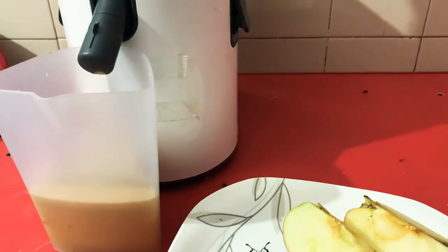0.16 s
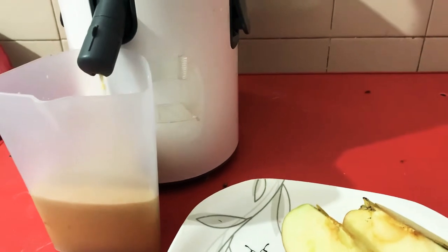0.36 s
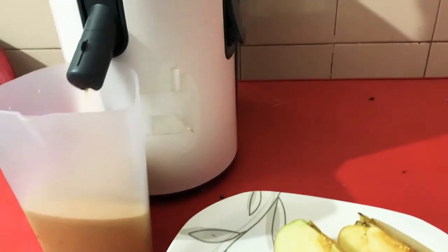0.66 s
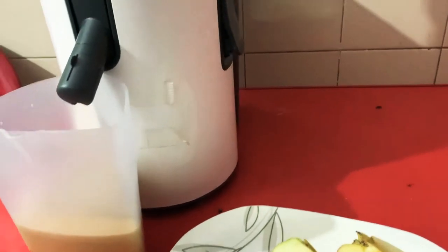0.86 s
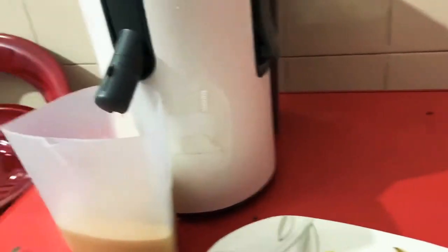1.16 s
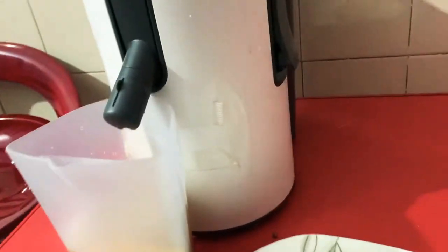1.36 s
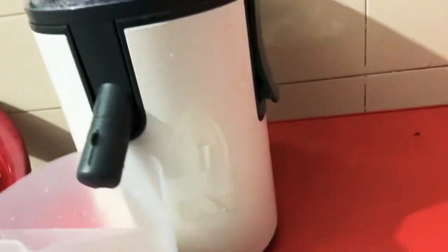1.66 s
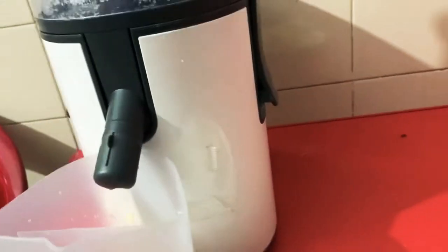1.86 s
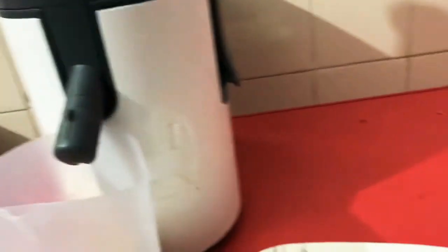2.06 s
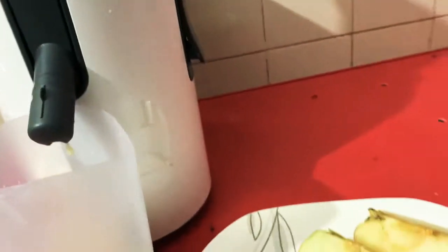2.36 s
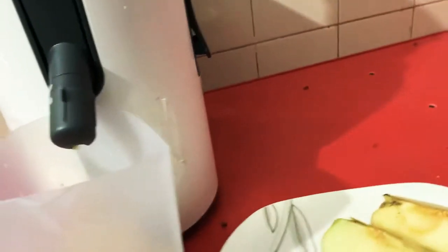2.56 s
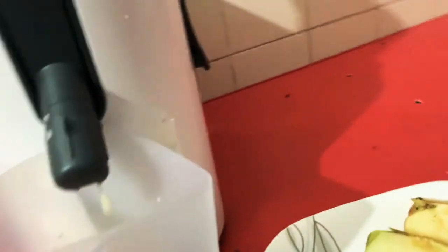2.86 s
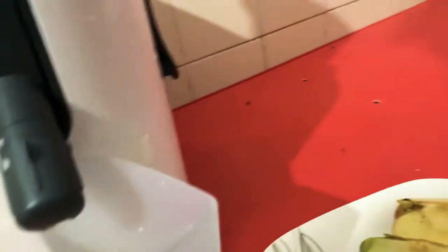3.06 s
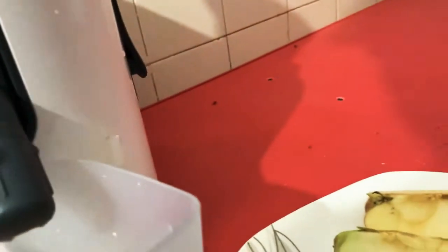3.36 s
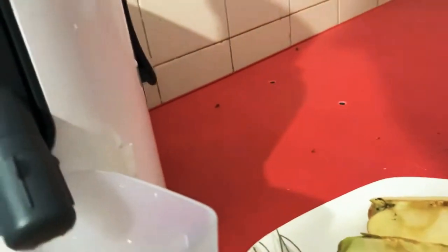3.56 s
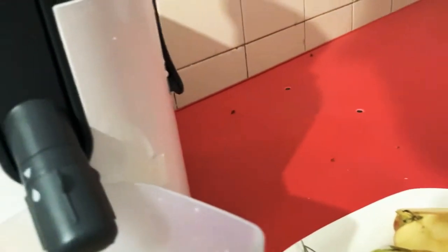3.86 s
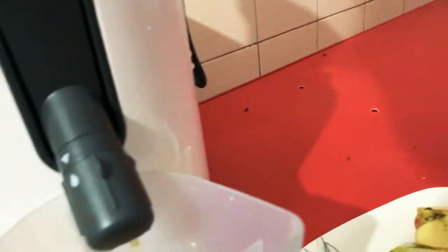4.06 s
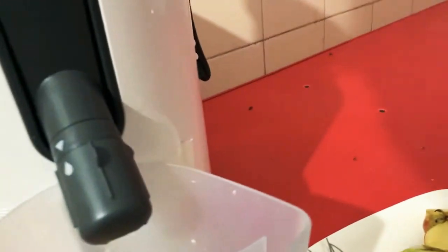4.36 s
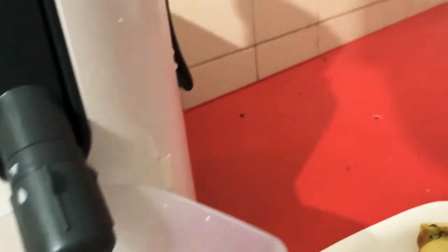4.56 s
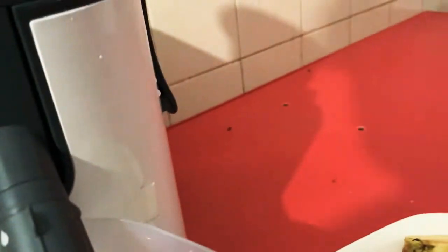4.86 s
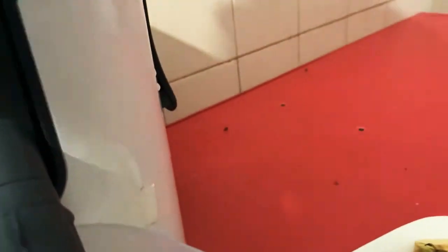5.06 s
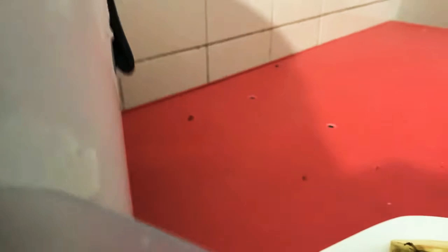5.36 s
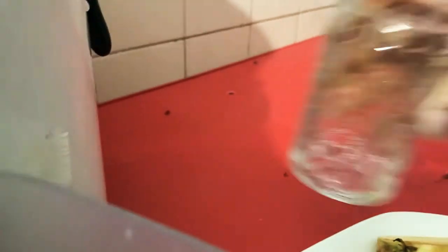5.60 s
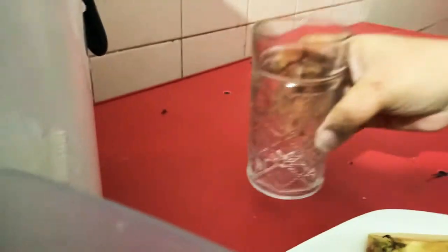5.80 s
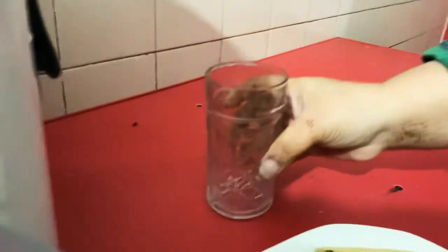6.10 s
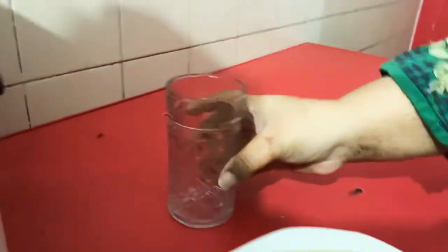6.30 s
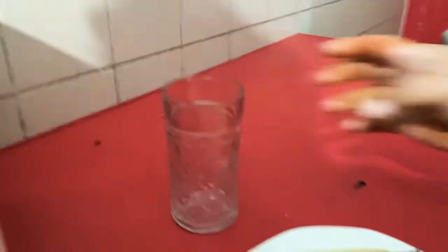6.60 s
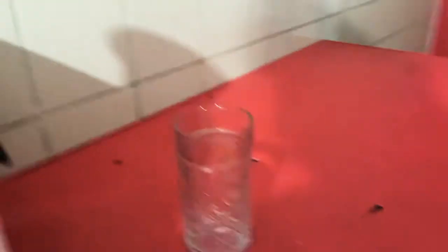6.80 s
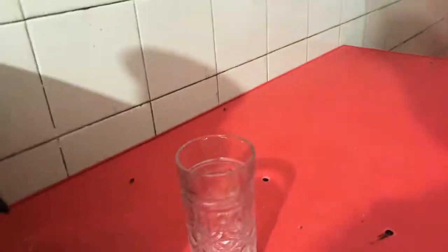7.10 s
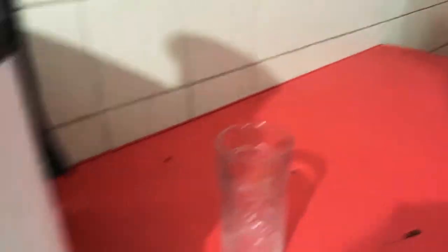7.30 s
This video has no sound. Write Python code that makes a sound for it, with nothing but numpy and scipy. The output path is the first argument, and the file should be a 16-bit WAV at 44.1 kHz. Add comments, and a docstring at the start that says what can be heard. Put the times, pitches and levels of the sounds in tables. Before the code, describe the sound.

Continuous motor drone from a kitchen juicer, rising very slightly in pitch at first, then steady, with brush hiss and rattly squeal. One dry tick comes midway. The handheld stereo microphone drifts from spout to housing, making the sound more nasal, whiny and bright. A glass thuds onto the counter, the power switch snaps brightly off the tiles, the buzz vanishes and the hum slides smoothly downward.

```python
"""Juicer switched off in a tiled kitchen

A centrifugal juicer on a counter: sines at rotor multiples hum and whine, current pulses buzz, shaped noise
makes air and brushes hiss, a wandering sine is pulp on the sieve. Decaying sines set down a glass, noise
bursts snap the switch, the rotor coasts down. A hand-held microphone pair moves around the machine, through
the standing waves of the corner."""
import sys
import numpy as np
from scipy import signal
from scipy.fft import rfft, irfft, next_fast_len
from scipy.io import wavfile
from scipy.ndimage import map_coordinates

SR = 44100
rng = np.random.default_rng(int(sys.argv[2]) if len(sys.argv) > 2 else 0)


def generate_wav(signal):
    """Clip the signal to [-1, 1] and save it as 16-bit WAV at the path in sys.argv[1]."""
    frames = np.transpose(np.atleast_2d(signal))
    scaled = np.clip(frames, -1, 1) * 32767
    pcm = np.round(scaled).astype(np.int16)
    wavfile.write(sys.argv[1], SR, pcm)


N = 328104
T = np.arange(N) / SR
OFF_S, MAINS_HZ = 6.138, 50
WHINE_ORDER, FAN_ORDER = 12, 15  # multiples of the rotor speed

# Recovery from the load of the last fruit; air drag halves the speed in COAST_S.
RUN_HZ, SAG_HZ, RECOVER_S, COAST_S = 176.15, 1.6, 0.95, 5.107


def rotor_speed():
    """Turns a second: sagging under load at first, steady, then coasting against air drag."""
    loaded_hz = RUN_HZ - SAG_HZ * np.exp(-T / RECOVER_S)
    return loaded_hz / (1 + np.maximum(T - OFF_S, 0) / COAST_S)


# Phase of the bass between the microphones. Each row: time in seconds, phase in radians.
HUM_SPREAD_RAD = [(0, 0.96), (.5, 1.64), (1.2, 1.77), (3.2, 1.76), (3.78, 0.73), (3.88, 0.16), (6, 0.071),
                  (7.44, 0.077)]
# Higher overtones. Each row: shaft order, level in dB at the spout, level in dB beside the housing,
# before shading and flutter.
OVERTONES_DB = [(6, -50, -41), (7, -39.5, -43), (8, -41, -42), (9, -44.5, -52.5), (10, -65, -50),
                (11, -57, -43), (13, -61, -45.5), (14, -46, -42), (16, -80, -51), (19, -63, -48.5),
                (20, -67, -59), (24, -55, -49.5), (26, -57, -47), (27, -58, -65), (28, -54, -51),
                (36, -60, -51)]
# Low overtones among the standing waves. Each row: time in seconds, level in dB of orders 2, 3, 4 and 5,
# before flutter.
LOW_OVERTONES_DB = [(.2, -49, -38, -56, -46), (.7, -61, -46, -52, -46), (1.35, -43, -33.5, -39, -36.5),
                    (1.9, -34.5, -41, -37, -36), (2.6, -36.5, -50, -34.5, -39), (3.4, -34.5, -43, -32, -40),
                    (3.8, -39, -30, -31, -44), (4.4, -38, -31.5, -31, -38), (5.2, -49, -28, -37.5, -40),
                    (5.9, -31, -27.5, -35, -41), (6.25, -33, -32, -29, -48)]
# Commutator whine. Each row: time in seconds, level in dB before flutter.
WHINE_DB = [(0, -43), (.8, -41), (1.1, -49), (1.5, -38), (2.28, -35), (2.38, -42), (3.2, -38), (3.42, -33),
            (5.3, -35), (5.42, -30), (5.62, -26.5), (5.76, -29.5), (5.86, -38)]
# Cooling fan whine. Each row: time in seconds, level in dB before flutter.
FAN_DB = [(0, -58), (2.7, -54), (3.3, -49), (3.5, -41), (4.2, -36.5), (4.9, -41), (5.15, -48), (5.6, -52)]
# Overtones with the power off. Each row: shaft order, level in dB before the corner's gain and fading.
COASTING_DB = [(2, -25.3), (3, -30.5), (4, -36), (5, -37.5), (6, -39), (7, -42), (10, -41), (11, -48),
               (12, -45.5), (14, -48), (17, -52), (20, -54), (36, -64)]
# Unbalance of the basket: level at the spout, gain beside the housing.
HUM_DB, HUM_NEAR_DB = -18.5, 4
# Microphone positions between which the overtones change balance.
SPOUT_EDGE, HOUSING_EDGE = 0.15, 0.33
# Shade close behind the jug: up to this position, at most this much.
JUG_EDGE, JUG_DB = 0.1, -3
# Flutter among the reflections under power, and roughness towards FADE_HZ (shares 0-1).
SLOW_FLUTTER, FAST_FLUTTER, ROUGHNESS, FADE_HZ = .17, .3, .33, 1050


def overtone_levels(place):
    """Order and running level in dB of each overtone, commutator and fan tone."""
    beside = np.clip((place - SPOUT_EDGE) / (HOUSING_EDGE - SPOUT_EDGE), 0, 1)
    shade_db = JUG_DB * np.clip(1 - place / JUG_EDGE, 0, 1)
    levels = [(round(order), spout_db + (side_db - spout_db) * beside + shade_db)
              for order, spout_db, side_db in OVERTONES_DB]
    levels += list(enumerate(curves(LOW_OVERTONES_DB), 2))
    return levels + [(WHINE_ORDER, curves(WHINE_DB)[0]), (FAN_ORDER, curves(FAN_DB)[0])]


def shaft(angle, speed, power, place):
    """Unbalance, bearings, commutator and fan sound at whole multiples of the rotor speed."""
    hum_db = HUM_DB + HUM_NEAR_DB * place + (1 - power) * corner_db(speed)
    out = amp(hum_db + 0.52 * wobble(14)) * tone(angle, curves(HUM_SPREAD_RAD)[0])
    grid_hz = np.geomspace(100, 12000, 4000)
    standing_db = corner_db(grid_hz)
    for order, db in overtone_levels(place):
        hz = order * speed
        height = np.minimum(order * RUN_HZ / FADE_HZ, 1) ** 4
        rough = ROUGHNESS * height * fading(130)
        flutter = 1.045 + SLOW_FLUTTER * fading(2.34) + FAST_FLUTTER * fading(22) + rough
        running = amp(db) * flutter
        # a high falling tone fades right out and in again
        coast_db = np.interp(order, *np.transpose(COASTING_DB)) + np.interp(hz, grid_hz, standing_db)
        fade = np.sqrt(1 - height ** 2) + height * fading(14)
        coasting = amp(coast_db) * fade * (1 + rough)
        gain = power * running + (1 - power) * coasting
        out += np.abs(gain) * tone(order * angle + np.angle(gain), apart(hz, place))
    return out


# Standing waves of the corner that tones sweep through. Each row: centre in Hz, half width (1/e) in Hz,
# gain in dB.
CORNER = [(147.4, 13, -5.5), (161.5, 1.1, -7), (295, 22, 5.5), (325.4, 2.6, -15), (341, 4, 6), (423, 6, 5),
          (445.6, 3.5, -13), (460, 5, 5.5), (477, 7, -10), (493, 6, 6), (508, 6, -3), (563, 6, 5),
          (621, 5, -12), (636, 6, 6), (692, 47, 11), (800, 45, -14), (2040, 60, 4)]


def corner_db(hz):
    """Gain of a tone as its pitch passes the peaks and nodes of the corner."""
    return sum(db * np.exp(-((hz - centre) / half) ** 2) for centre, half, db in CORNER)


# Motor tones that stand out. Each row: shaft order, mains multiple, level in dB at the spout,
# level in dB beside the housing, before wobble.
MAGNETIC = [(0, 1, -52, -45), (0, 2, -31, -27.5), (1, -1, -37.5, -29.5), (1, 2, -28, -32),
            (2, 1, -35.5, -24.5), (2, 3, -36.5, -37.5), (4, -2, -36, -68), (12, -2, -48, -43),
            (12, -1, -45, -56)]
# Weak sidebands: level at the spout, change beside the housing.
SIDEBAND_DB, SIDEBAND_NEAR_DB = -46, 8


def sidebands():
    """The motor tones that stand out, and an even bed of weak ones in between."""
    strong = {(round(order), round(multiple)): levels for order, multiple, *levels in MAGNETIC}
    weak = {(order, multiple): (SIDEBAND_DB, SIDEBAND_DB + SIDEBAND_NEAR_DB)
            for order in (0, 1, 2, 3) for multiple in (-2, -1, 1, 2, 3) if order or multiple > 1}
    return {**weak, **strong}.items()


# Buzz spectrum. Each row: frequency in Hz, relative gain in dB.
BUZZ = [(60, -22), (200, -6), (330, -1), (480, -2.5), (660, -1.5), (850, -4.5), (1150, -6), (1400, -8.5),
        (1900, -11), (2600, -17), (4500, -21), (9000, -32)]


def motor(angle, current, power, place):
    """Current pulses pull on the turning rotor: mains sidebands stand around the shaft orders."""
    mains = 2 * np.pi * MAINS_HZ * T
    tones = np.zeros((2, N))
    for (order, multiple), (spout_db, side_db) in sidebands():
        phase = order * angle + multiple * mains
        db = spout_db + (side_db - spout_db) * place + (1.2 + .5 * order) * wobble(5)
        hz = np.gradient(phase) * SR / (2 * np.pi)
        tones += amp(db) * tone(phase, apart(hz, place))
    # the pull peaks once a turn; it meets every other current pulse, so the buzz throbs
    turn = np.linspace(0, 2 * np.pi, 1024)
    orders = np.arange(1, 40)[:, None]
    profile = np.sin(orders * turn + rng.normal(0, .45, orders.shape)).sum(0)
    # the steady part of the pull belongs to the plain shaft orders
    pulses = current - current.mean()
    pull = coloured(pulses * np.interp(angle % (2 * np.pi), turn, profile), BUZZ)
    # beside the housing the buzz is more nasal
    nasal = filtered(pull, lambda hz: resonance(hz, centre_hz=950, width_hz=500))
    pull = pull + .9 * place * nasal
    # as the microphones drift, one set of reflections gives way to another
    drift = 1.27 * T + 0.83 * wobble(2.02)
    reflections = np.cos(drift) * kitchen(pull) + np.sin(drift) * kitchen(pull)
    buzz = unit(heard(pull, place, room_db=-12) + amp(-5) * unit(reflections))
    return power * (tones + amp(-30.3 + 3.2 * place) * buzz)


# Motor housing ringing near the commutator pitch. Each row: time in seconds, level in dB before wobble.
HOUSING_DB = [(0, -61), (2.6, -42), (3.4, -46), (5.22, -41), (5.4, -29.5), (5.7, -31.5), (5.85, -37),
              (6.1, -35.5), (6.4, -48), (7.44, -61)]


def housing(angle, current, power, place):
    """The motor housing rings near the commutator pitch; each current pulse makes the whine rasp in it."""
    ring = unit(ringing(centre_hz=2110, width_hz=400))
    rasp = unit((current - current.mean()) * np.sin(WHINE_ORDER * angle))
    sound = heard(ring + amp(-7) * power * rasp, place, room_db=-4.5)
    return amp(curves(HOUSING_DB)[0] + 1.2 * wobble(23)) * sound


# Fan air spectrum. Each row: frequency in Hz, relative level in dB per Hz.
AIR = [(25, -20), (60, 1.5), (130, 7), (300, 2.5), (700, -3.5), (1300, -3.5), (2100, -8.5), (3000, -8.5),
       (5000, -9), (8000, -20), (15000, -29)]


def air(power, place):
    """Fan air: broad noise, a little weaker with the power off."""
    db = -31.6 + 2.4 * power + 1.6 * wobble(6)
    return amp(db) * heard(coloured(rng.standard_normal(N), AIR), place, room_db=7.5)


# Body rumble spectrum. Each row: frequency in Hz, relative level in dB per Hz.
RUMBLE = [(25, -35), (50, -12), (85, -3), (115, 12), (170, -33), (230, 0), (320, -2), (480, -4.5), (800, 1),
          (1600, -28)]


def rumble(power, place):
    """The shaking body: low noise, stronger beside the housing."""
    db = -33 + 6 * place - 11 * (1 - power) + 0.81 * wobble(6.2)
    return amp(db) * heard(coloured(rng.standard_normal(N), RUMBLE), place, room_db=7.0)


# Noise ringing in the sieve basket. Each row: time in seconds, level in dB before wobble,
# side gain over mid in dB.
BASKET = [(0, -30, 1), (.3, -30.5, -11), (1.4, -32, -12.5), (2.4, -29, 2.5), (3.2, -27.5, 3.5),
          (5, -29, 8.5), (5.5, -26.5, 12), (6.2, -26, 10), (7.44, -33.5, 17)]


def sieve(angle, current, power, place):
    """The sieve basket rings as a noise resonance, pumped by the current pulses and the turn."""
    basket_db, width_db = curves(BASKET)
    pumping = 1 + .6 * power * current * (1 + np.sin(angle))
    ring = heard(ringing(centre_hz=1530, width_hz=450) * pumping, place, room_db=7)
    return widened(amp(basket_db + .6 * wobble(14) + 1.8 * wobble(55)) * ring, width_db)


# Brush hiss. Each row: time in seconds, level in dB before wobble.
BRUSHES_DB = [(0, -47), (1.2, -36.5), (2.6, -35.5), (3.4, -32.5), (4.6, -33), (5.5, -30), (6.1, -36),
              (6.5, -34), (7.44, -40.5)]
# Brush hiss spectrum. Each row: frequency in Hz, relative level in dB per Hz.
HISS = [(900, 1), (2200, 0), (2700, -3), (3300, -3), (4600, 2), (5600, -3), (6400, -3.5), (8200, -9),
        (10500, -7), (14000, -36)]


def brushes(angle, current, power, place):
    """The brushes scrape harder once a turn and spark with each current pulse."""
    strength = 1 + 0.85 * np.sin(angle) + 0.43 * power * current * (1 + np.sin(angle))
    scrape = rng.standard_normal(N) * strength * amp(1.7 * wobble(150))
    db = curves(BRUSHES_DB)[0] + 0.41 * wobble(13.0) + 1.0 * wobble(40)
    return amp(db) * heard(coloured(scrape, HISS), place, room_db=13.0)


# Pulp chatter. Each row: time in seconds, level in dB.
CHATTER_DB = [(0, -35), (.15, -28), (.35, -31), (1.1, -30.5), (2.3, -32.5), (2.5, -29.5), (2.65, -34),
              (3.3, -34), (4.1, -30.5), (4.85, -34), (5.02, -28.5), (5.2, -42), (6.5, -52)]
CHATTER_HZ, CHATTER_WANDER_HZ = 1540, 70


def chatter(place):
    """Pulp chatters on the sieve: a rattly squeal of restless pitch that comes in quick spurts."""
    hz = CHATTER_HZ + CHATTER_WANDER_HZ * wobble(85)
    spurts = amp(2 * wobble(18) + 3 * wobble(110))
    squeal = unit(spurts * np.sin(2 * np.pi * np.cumsum(hz) / SR))
    return amp(curves(CHATTER_DB)[0]) * widened(heard(squeal, place, room_db=-1), width_db=-4)


# Noise bands, narrow and wide: middle tones, a low bump, airy treble. Each row: peak time in seconds,
# half length (1/e) in seconds, centre in Hz, resonance width in Hz, peak level in dB.
SWELLS = [(.45, 0.21, 277, 51, -43), (0.703, 0.21, 708, 80, -34), (1.5, 2.6, 12500, 4500, -52),
          (4.1, 0.52, 2870, 500, -41), (4.222, 0.19, 95, 60, -24), (4.398, 2.9, 1068, 270, -40.5),
          (5.552, 0.78, 5150, 400, -39.5), (6.43, 0.17, 13600, 450, -45), (7.102, 0.56, 2860, 603, -40),
          (1.375, 0.072, 1910, 50, -30), (2, 4.4, 10500, 350, -48), (6.657, .05, 1590, 90, -34),
          (7.355, .06, 1440, 70, -32)]


def swells(place):
    """Bands of noise, narrow and wide, that rise and fall once."""
    bands = sum(amp(db) * np.exp(-((T - s) / half_s) ** 2) * unit(ringing(hz, width_hz))
                for s, half_s, hz, width_hz, db in SWELLS)
    return bands.std() * heard(bands, place, room_db=7)


# Glass meets counter. Each row: time in seconds, relative level in dB.
KNOCKS = [(6.0552, -11.5), (6.0608, -4.5), (6.084, -13.5), (6.094, -21)]
# Modes of glass on counter top. Each row: frequency in Hz, relative level in dB, t60 in seconds.
COUNTER = [(112, -29, 0.15), (261, -3, 0.14), (314, -1, 0.06), (490, 4.5, 0.029), (620, 5.5, 0.026),
           (784, 1.5, 0.028), (900, -12, .04)]


def glass():
    """The hand-damped glass lands on its rim, then flat, and thumps the counter."""
    out = np.zeros(N)
    for s, db in KNOCKS:
        start = round(s * SR)
        t = np.maximum(T - s, 0)[start:][:SR // 3]
        ring = sum(amp(level_db + rng.normal(0, 1) - 60 * t / t60) * np.sin(2 * np.pi * hz * t)
                   for hz, level_db, t60 in COUNTER)
        attack = 1 - np.exp(-t / .0009)
        out[start:][:len(t)] += amp(db - 4) * ring * attack
    return amp(1) * out + amp(-10) * kitchen(out)


# Switch rocks over, lands and rattles. Each row: time in seconds, level in dB, t60 in seconds,
# room level in dB relative to direct.
CLICKS = [(6.1297, -16, .026, 2), (6.1358, -22, .03, 5), (6.1405, -22.5, .04, 8), (6.1505, -24, .05, 8)]
# Click spectrum. Each row: frequency in Hz, relative level in dB per Hz.
SNAP = [(150, 19), (600, 11), (2000, -10), (3500, 7.5), (5000, 2), (7000, 6), (10000, -2.5), (15000, -10)]


def clicks():
    """Hard plastic snaps: short bright bursts that the tiles throw back."""
    noise = coloured(rng.standard_normal(N), SNAP)
    direct, thrown = np.zeros(N), np.zeros(N)
    for s, db, t60, room_db in CLICKS:
        burst = noise * (T >= s) * amp(db - 60 * np.maximum(T - s, 0) / t60)
        direct += burst
        thrown += amp(room_db) * burst
    return direct + kitchen(thrown)


# Clack spectrum. Each row: frequency in Hz, relative level in dB per Hz.
PIP = [(1200, -18), (2200, 1), (3000, 0), (3900, 0), (4800, -11), (14000, -26)]
PIP_S, PIP_DB = 3.3548, -18.5  # level of the clack at its onset


def pip():
    """One dry tick of a pip flung against the basket: a bright crack and a short plastic clack."""
    t = np.maximum(T - PIP_S, 0)
    clack = coloured(rng.standard_normal(N), PIP) * amp(-60 * t / .045)
    crack = .5 * rng.standard_normal(N) * amp(-60 * t / .007)
    tick = amp(PIP_DB) * (T > PIP_S) * (clack + crack)
    return tick + amp(-7) * kitchen(tick)


# Room decay. Each row: frequency in Hz, t60 in seconds.
KITCHEN_T60_S = [(150, 1), (1500, 0.59), (7000, 0.42), (14000, 0.56)]


def kitchen(x):
    """The tiled room's answer at both microphones; the bass is alike in both."""
    hz, t, z = signal.stft(rng.standard_normal((2, SR // 2)), SR, nperseg=256)
    z = z * amp(-60 * t / along(KITCHEN_T60_S, hz)[:, None])
    z[1] *= (np.hypot(hz, 170) / np.hypot(hz, 700))[:, None]
    mid, side = signal.istft(z, SR, nperseg=256)[1]
    tail = np.array([mid + side, mid - side])
    tail = tail / np.linalg.norm(tail[0])
    # steady sounds have already filled the room at the start
    running = np.pad(x, (SR // 2, 0), 'reflect')
    return signal.fftconvolve(running[None], tail, axes=1)[:, SR // 2:][:, :N]


# Depth of the microphones in a node of a low room mode. Each row: time in seconds, share 0-1.
NODE = [(0, 0), (.6, 0.04), (1.05, 0.85), (2.9, 1), (3.4, 0.1), (7.44, 0)]


def standing_wave(x):
    """Long waves reach both microphones alike, but differ in phase near the spout and astride a node."""
    mid, side = mid_side(x)

    def band(centre_hz, width_hz, turn):
        return filtered(mid, lambda hz: turn * np.abs(resonance(hz, centre_hz, width_hz)) ** 2)

    node, spread = curves(NODE)[0], curves(HUM_SPREAD_RAD)[0]
    side = filtered(side, lambda hz: (hz ** 2 + 200 ** 2) / (hz ** 2 + 400 ** 2))
    # turn=1j: a quarter cycle apart from mid
    side = side + amp(-1.5) * np.sin(spread / 2) * band(centre_hz=90, width_hz=62, turn=1j)
    side = side + amp(0.5) * node * band(centre_hz=282, width_hz=38, turn=1j)
    mid = mid - node * band(centre_hz=240.6, width_hz=86, turn=1)
    return np.array([mid + side, mid - side])


# Sliding dip between the reflections. Each row: time in seconds, centre in Hz, depth in dB.
HOLLOW = [(0, 850, 3.5), (1, 835, 5), (1.7, 700, 0), (2.6, 540, 8), (3.5, 550, 2), (4.6, 560, 3),
          (5.4, 825, 1), (6.1, 814, 6)]
HOLLOW_OCTAVES = 0.4  # 1/e reach


def hollowed(x):
    """A sliding dip in the middle band, with a gentler hump half an octave to either side."""
    hz, t, z = signal.stft(x, SR, nperseg=1024)
    s, dip_hz, depth_db = np.transpose(HOLLOW)
    octaves = np.log2((hz[:, None] + 1) / np.interp(t, s, dip_hz))
    shape = np.cos(2 * np.pi * octaves) * np.exp(-(octaves / HOLLOW_OCTAVES) ** 2)
    db = -np.interp(t, s, depth_db) * shape
    return signal.istft(z * amp(db), SR, nperseg=1024)[1][:, :N]


def lead(place):
    """Seconds by which sound from the machine reaches the left microphone first."""
    return np.interp(place, [.1, .5], [.00023, .00046])


def heard(x, place, room_db):
    """Direct sound, earlier on the left, plus the room; rms 1."""
    shift = lead(place) * SR / 2
    direct = np.array([map_coordinates(x, [np.arange(N) + sign * shift], order=3) for sign in (1, -1)])
    return unit(direct + amp(room_db) * kitchen(x))


def apart(hz, place):
    """Phase of a tone between the microphones: grows with pitch until the room's standing waves take over."""
    travel = np.minimum(np.pi * hz * lead(place) * 1.3, 1.3)
    return (travel + .35 * wobble(2)) * hz ** 2 / (hz ** 2 + 250 ** 2)


def tone(phase, spread):
    """A sine of rms 1 whose phase differs between the microphones."""
    both = np.array([spread, -spread]) / 2
    return np.sqrt(2) * np.sin(phase + rng.uniform(0, 2 * np.pi) + both)


def fading(rate):
    """Complex gain of power 1 of many reflections that shift against each other."""
    return unit(wobble(rate)) / np.sqrt(2) + 1j * unit(wobble(rate)) / np.sqrt(2)


def mid_side(x):
    """What the two microphones share, and how they differ."""
    return (x[0] + x[1]) / 2, (x[0] - x[1]) / 2


def widened(x, width_db):
    """Stereo x with its side raised over its mid, at about the same power."""
    mid, side = mid_side(x)
    gain = amp(width_db)
    return np.array([mid + gain * side, mid - gain * side]) * np.sqrt(2 / (1 + gain ** 2))


def resonance(hz, centre_hz, width_hz):
    """Response of one resonance, 1 at its centre."""
    return 1j * hz * width_hz / (centre_hz ** 2 - hz * hz + 1j * hz * width_hz)


def ringing(centre_hz, width_hz):
    """Noise through one resonance twice, for steep sides."""
    return filtered(rng.standard_normal(N), lambda hz: resonance(hz, centre_hz, width_hz) ** 2)


def coloured(x, spectrum):
    """x times the given spectrum, at rms 1."""
    return unit(filtered(x, lambda hz: amp(along(spectrum, hz))))


def filtered(x, response):
    """x times a response of frequency."""
    size = next_fast_len(N + SR // 2)
    return irfft(rfft(x, size) * response(np.fft.rfftfreq(size, 1 / SR)), size)[..., :N]


def wobble(rate):
    """A smooth random curve, rate knots a second."""
    coarse = T[::100]
    knots = rng.standard_normal(int(T[-1] * rate) + 4)
    return np.interp(T, coarse, map_coordinates(knots, [coarse * rate]))


def curves(rows):
    """One value per sample for each column after the time."""
    s, *cols = np.transpose(rows)
    return [np.interp(T, s, c) for c in cols]


def along(points, hz):
    """(Hz, value) points interpolated on a log axis."""
    f, v = np.transpose(points)
    return np.interp(np.log(hz + 1), np.log(f + 1), v)


def amp(db):
    """Amplitude factor of a level in dB."""
    return 10 ** (np.asarray(db) / 20)


def unit(x):
    """x at rms 1."""
    return x / np.sqrt(np.mean(x ** 2) + 1e-20)


# Microphone position. Each row: time in seconds, position from 0 at the spout to 1 beside the housing.
PLACE = [(0, 0.013), (1.2, 0.21), (2.6, 0.15), (3.7, 0.33), (4.7, 0.56), (5.4, 0.97), (6.1, 0.54)]


def scene():
    """One rotor angle, power decay and current pulse train drive the machine; glass, switch and pip join."""
    speed, place = rotor_speed(), curves(PLACE)[0]
    angle = 2 * np.pi * np.cumsum(speed + 0.061 * wobble(10)) / SR
    power = np.exp(-np.maximum(T - OFF_S, 0) / 0.079)
    # on low speed the motor draws one short pulse of current per mains cycle
    current = np.exp(6 * (np.cos(2 * np.pi * MAINS_HZ * T) - 1))
    drive = angle, current, power, place
    rushing = air(power, place) + rumble(power, place) + sieve(*drive) + brushes(*drive)
    drone = hollowed(standing_wave(motor(*drive) + rushing))
    rattles = chatter(place) + housing(*drive) + swells(place)
    return shaft(angle, speed, power, place) + drone + rattles + glass() + clicks() + pip()


# Stereo width of the microphone pair. Each row: frequency in Hz, side gain over mid in dB.
PAIR_WIDTH_DB = [(1900, 0), (2500, -1), (3250, 4), (4250, -2.5), (5200, 2.5), (6000, -3.5), (7200, 0),
                 (8000, 1.5)]
TOP_HZ = 14600


def record(dry):
    """The pair colours the width, sheds the deepest bass, rounds high peaks and passes nothing above TOP_HZ."""
    width_db = along(PAIR_WIDTH_DB, np.fft.rfftfreq(N, 1 / SR))
    pair = irfft(widened(rfft(dry), width_db), N)
    thin = filtered(pair, lambda hz: hz ** 3 / (hz ** 3 + 42 ** 3))
    rounded = thin / (1 + np.abs(thin / .92) ** 8) ** (1 / 8)
    return filtered(rounded, lambda hz: hz < TOP_HZ)


dry = scene()
out = record(dry)
generate_wav(out)
```